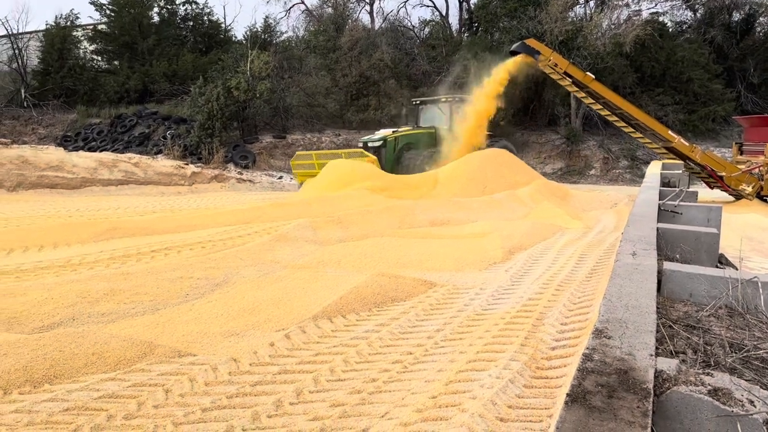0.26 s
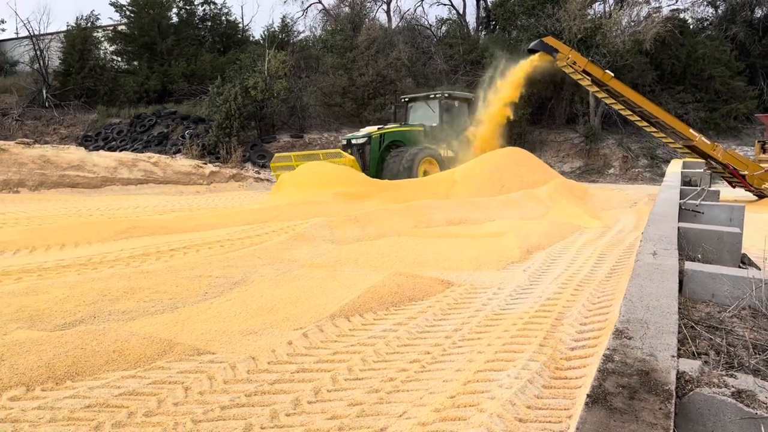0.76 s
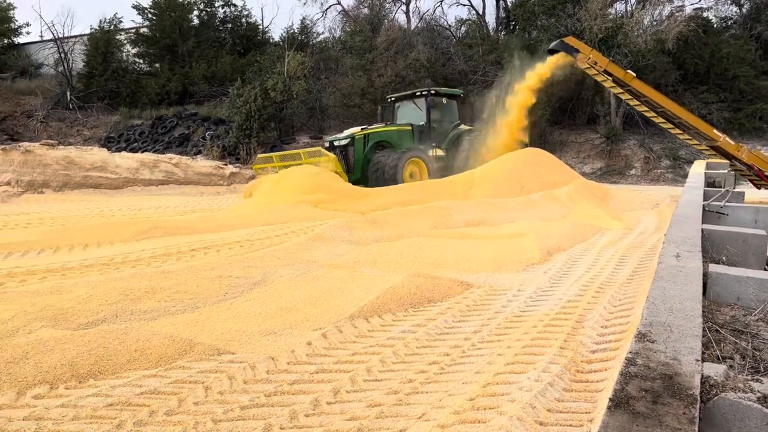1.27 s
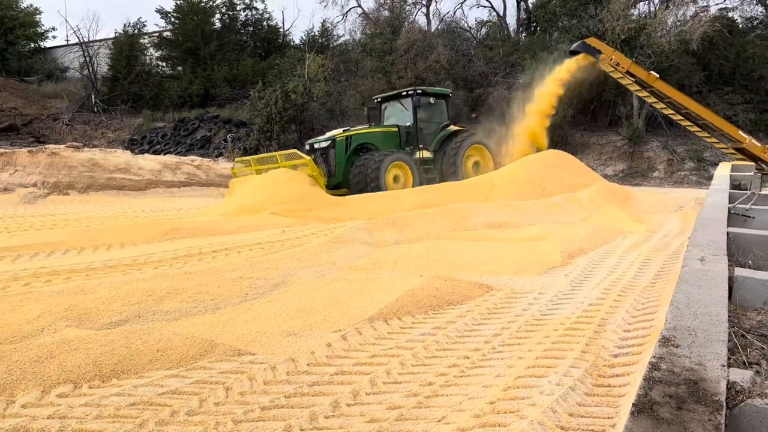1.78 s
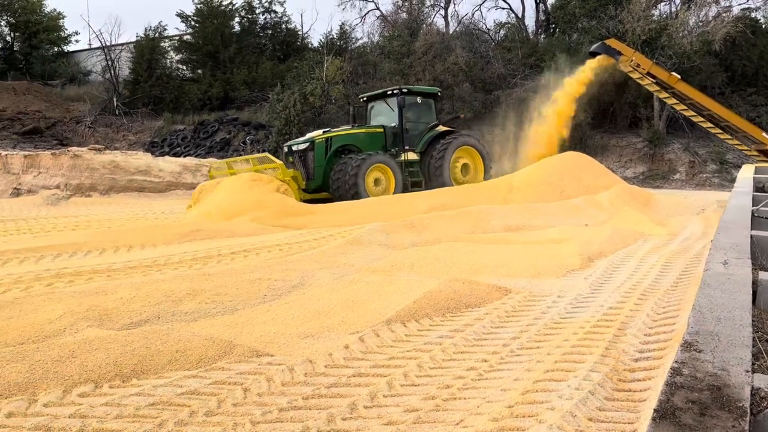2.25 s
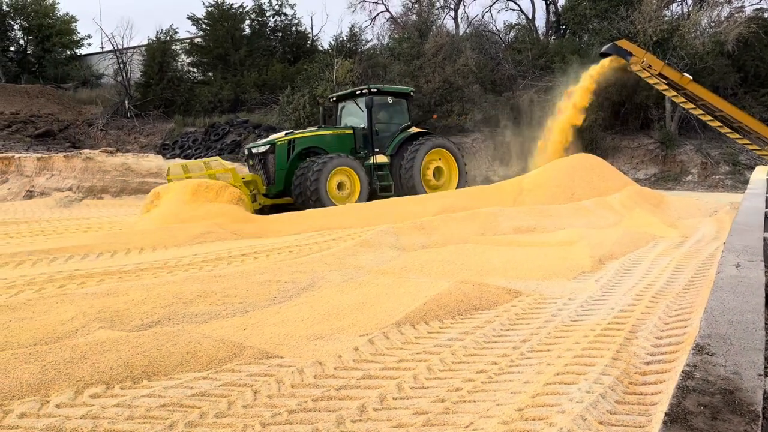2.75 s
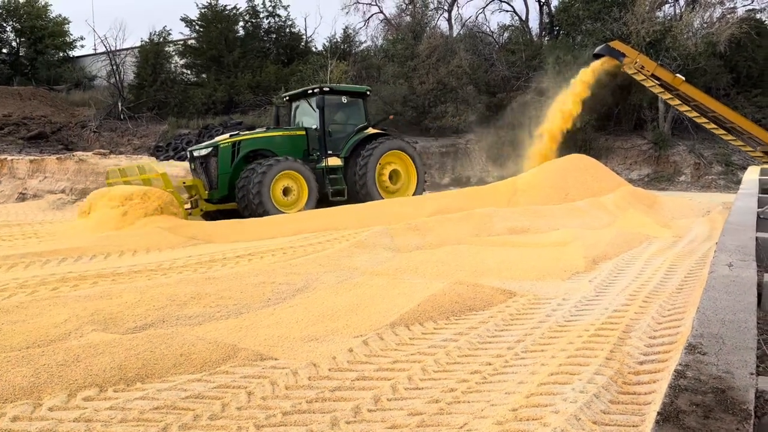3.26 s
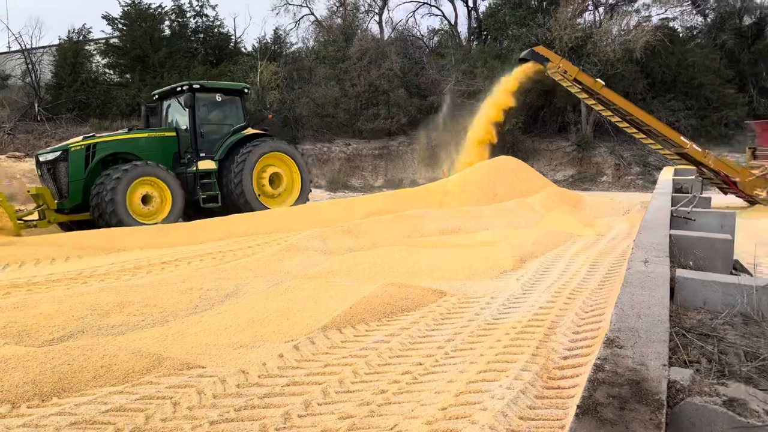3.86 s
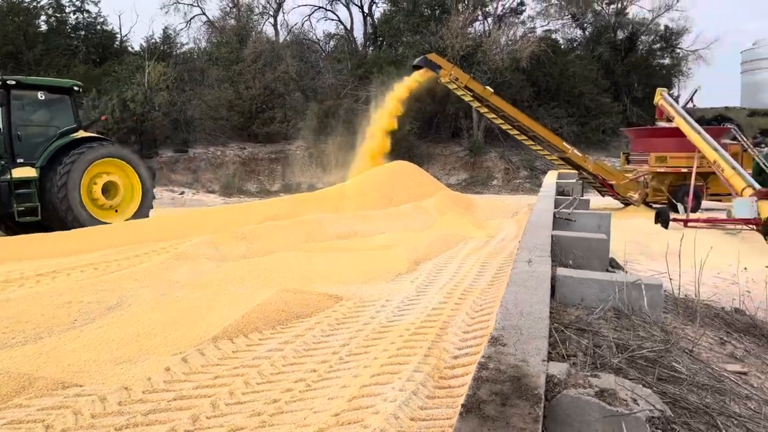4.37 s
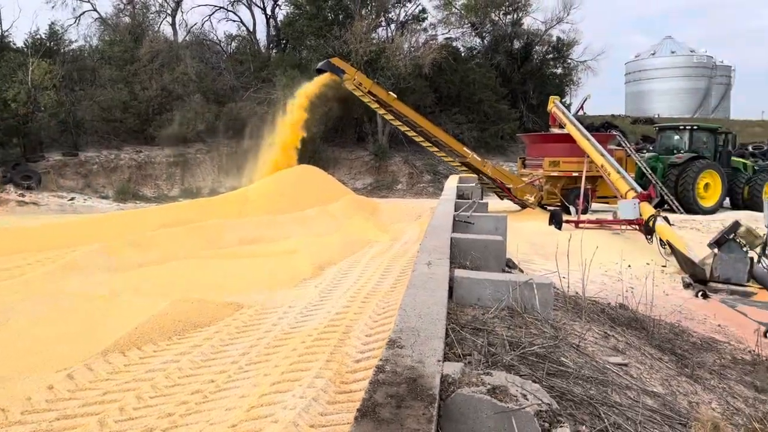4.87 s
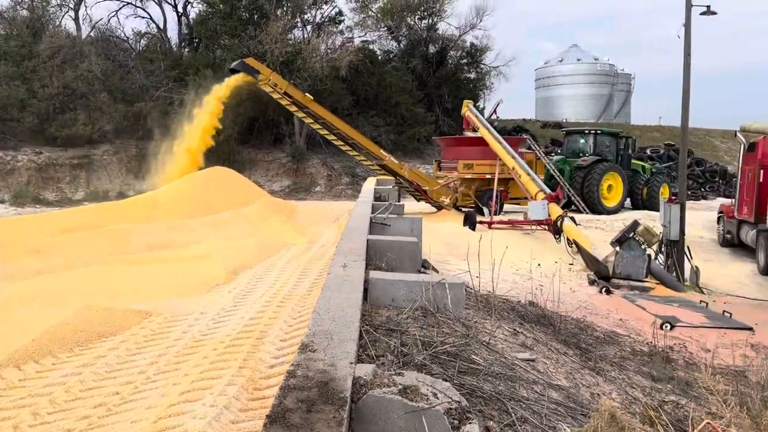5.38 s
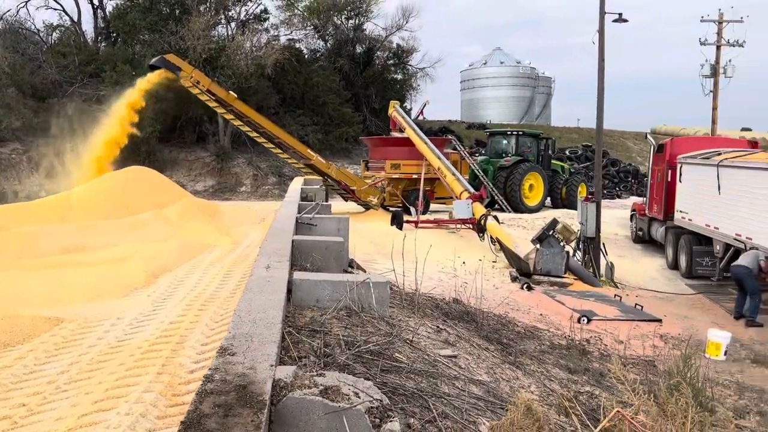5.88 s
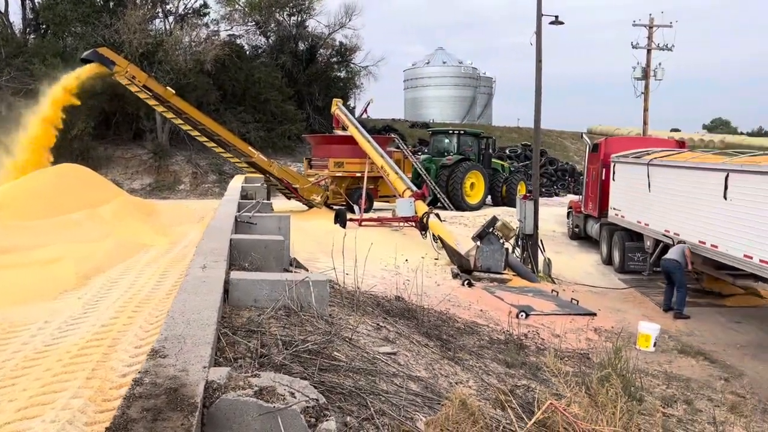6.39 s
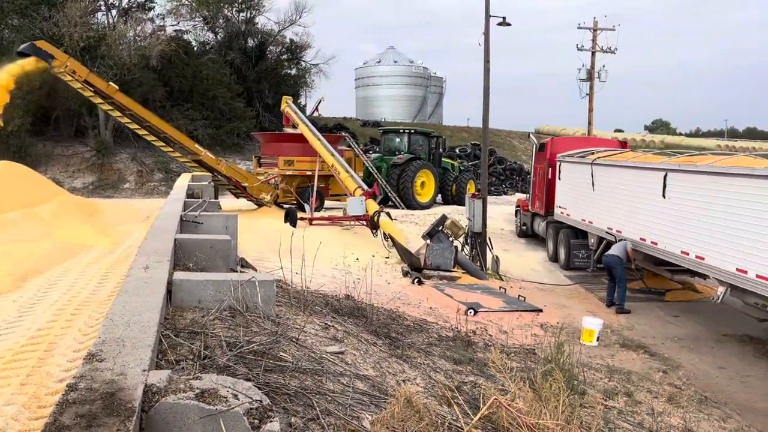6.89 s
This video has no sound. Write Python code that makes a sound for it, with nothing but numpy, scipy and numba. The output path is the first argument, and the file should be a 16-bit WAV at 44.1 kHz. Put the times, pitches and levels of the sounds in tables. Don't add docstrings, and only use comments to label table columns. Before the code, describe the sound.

Across an open farm yard, a grain grinder roars densely over a droning diesel, while augers rattle and throb about eight times a second and grain hisses. Dull knocks and small clatter strike sheet metal. Wind buffets the handheld microphone throughout, lightly at first, then in heavy low thumps during the last third, as a faint turbo whine dips and rises.

```python
import sys
import numpy as np
from scipy import signal
from scipy.fft import rfft, irfft, next_fast_len
from scipy.io import wavfile
from scipy.ndimage import uniform_filter1d, map_coordinates
from numba import njit

SR = 44100
rng = np.random.default_rng(int(sys.argv[2]) if len(sys.argv) > 2 else 0)


def convert_level_to_amplitude(level_db):
    exponent = np.asarray(level_db, float) / 20
    return 10 ** exponent


def materialize(psi):
    bounded = np.clip(np.atleast_2d(psi).T, -1, 1)
    quanta = np.round(bounded * 32767).astype(np.int16)
    wavfile.write(sys.argv[1], SR, quanta)


N = 314874
T = np.arange(N) / SR
SIZE = next_fast_len(N)
HZ = np.arange(SIZE // 2 + 1) * SR / SIZE
LEFT_RIGHT = np.array([[1], [-1]])


def curves(table):
    s, *columns = np.transpose(table)
    return [np.interp(T, s, column) for column in columns]


def unit(x):
    return x / np.sqrt(np.mean(x ** 2))


def walk(rate_hz):
    levels = rng.standard_normal(int(T[-1] * rate_hz) + 3)
    smooth = map_coordinates(levels, [T[::64] * rate_hz], order=3)
    return unit(smooth.repeat(64)[:N])


def grit(spiky_db):
    return rng.standard_normal((2, N)) * convert_level_to_amplitude(spiky_db * rng.exponential(size=N))


def roar(colour, source, flicker_db, rate_hz, count):
    hz, db = np.transpose(colour)
    octave = np.log2(np.clip(HZ, hz[0], hz[-1]) / hz[0])
    gain = convert_level_to_amplitude(np.interp(octave, np.log2(hz / hz[0]), db))
    spectrum = rfft(source, SIZE) * gain * (HZ > hz[0]) * (HZ < hz[-1])
    place = octave / octave[-1] * (count - 1)
    total = 0
    for k in range(count):
        band = irfft(spectrum * np.clip(1 - abs(place - k), 0, 1), SIZE)[:, :N]
        total = total + band * convert_level_to_amplitude(flicker_db * walk(rate_hz))
    return unit(total)


@njit
def svf(x, hz, width):
    y, b, l = np.empty(len(x)), 0., 0.
    for i in range(len(x)):
        g, k = np.tan(np.pi * hz[i] / SR), width / hz[i]
        v = (b + g * (x[i] - l)) / (1 + g * (g + k))
        b, l, y[i] = 2 * v - b, l + 2 * g * v, k * v
    return y


def ring(hz, width_hz):
    return unit(np.array([svf(svf(row, hz, width_hz), hz, width_hz) for row in grit(.8)]))


def tone(hz, db, wobble_hz, waver_db):
    phase = 2 * np.pi * np.cumsum(hz + wobble_hz * walk(30.)) / SR
    return np.sqrt(2) * convert_level_to_amplitude(db + waver_db * walk(7.3)) * np.sin(phase)


def throb(depth_db, first_s, sharp):
    paddle_hz = 8.5
    turn = np.cos(2 * np.pi * paddle_hz * (T - first_s)) - 1
    strength = 1.5 + .5 * np.tanh(walk(paddle_hz))
    return convert_level_to_amplitude(depth_db * np.exp(sharp * turn) * strength)


# start_s, facing_grinder (0-1), body_shading_troughs (0 up), exhaust_in_view (0-1),
# augers_in_view (0-1)
PHONE_TURN = [(0, 0.4, 0, 0.17, .5), (.5, 0.47, 0.13, 0.4, .5), (1.3, 0.2, 0.36, 0.32, 0.67),
              (2.1, 0, 0.6, 0.5, 0.3), (2.8, .3, 1, 0.66, 0.76), (3.35, 0.63, 1.2, 0.82, 1),
              (3.7, 0.44, .6, 0.3, 0.57), (4.1, .75, 0, 0.63, .9), (4.5, 0.66, 0.3, 0.42, 0.2),
              (5.1, 0.63, 0.77, 0.62, 0.35), (5.9, 0.64, 0.4, 0.66, 0.57), (6.5, 0.7, .5, 0.88, 0.8),
              (7.14, 0.76, .1, 0.95, 0.6)]


def phone_turn():
    return curves(PHONE_TURN)


# start_s, strength_db, coarseness (-1 fine to 1 coarse)
WIND_STRENGTH = [(0, -29.5, 0.06), (.5, -29.5, 0.044), (1.2, -31.5, -0.0062), (1.9, -28.5, 0.052),
                 (2.5, -28.5, -0.24), (3., -33, 0.41), (3.5, -28.5, -0.056), (4.2, -26.5, -0.13),
                 (4.6, -28, -0.11), (5.2, -26, -0.078), (5.45, -29, -0.11), (5.7, -25, 0.26),
                 (6., -21, 0.29), (6.22, -22, 0.18), (6.35, -26, -0.49), (6.6, -29.5, 0.26),
                 (6.85, -24.5, 0.24), (7.14, -28.5, -0.13)]
# peak_s, level_db, eddy_hz
WIND_SWELLS = [(0.08, -25.5, 236), (0.224, -26, 235), (0.504, -18, 132), (0.559, -27, 132),
               (0.768, -29, 176), (0.803, -19, 98), (0.803, -21, 315), (0.893, -24, 74),
               (0.928, -25, 236), (1.252, -25, 236), (1.262, -21, 74), (1.282, -21, 315),
               (1.671, -32, 132), (1.715, -26, 290), (1.9, -21, 269), (1.27, -25, 220), (1.821, -23, 315),
               (1.836, -25, 74), (2.165, -35, 132), (2.3, -22, 422), (2.355, -27, 74), (2.464, -27, 422),
               (2.844, -21, 315), (3.327, -25, 55), (3.332, -23, 315), (3.377, -24, 315),
               (3.392, -25, 98), (3.527, -25, 236), (3.886, -26, 314), (3.941, -29, 315),
               (3.981, -29, 176), (4.076, -24, 422),
               (4.3, -27, 420), (4.5, -19.5, 330), (5.62, -29, 198), (6.04, -26, 200), (5.88, -23, 180),
               (4.39, -23, 132), (4.425, -28, 132), (4.5, -16, 98), (4.654, -28, 74), (4.904, -28, 236),
               (5.298, -20.5, 234), (5.373, -21, 236), (5.468, -28, 132), (5.567, -19.5, 132),
               (5.662, -7.5, 74.5), (5.807, -21, 74), (5.842, -17, 74), (5.877, -24, 236), (5.976, -11, 74),
               (6.0, -19, 236), (6.066, -17, 98), (6.176, -14, 98), (6.241, -12.5, 131), (6.281, -31, 176),
               (6.341, -25, 315), (6.41, -18, 315), (6.48, -22.4, 422), (6.585, -19, 422), (6.67, -21, 315),
               (6.715, -22.5, 132), (6.82, -21, 98), (6.834, -16.5, 422), (6.854, -27, 98),
               (6.914, -20, 315), (7.079, -21, 176),
               (.28, -31, 55), (5.96, -18, 50), (4.72, -33, 140), (5.4, -26, 140), (6.86, -20, 270),
               (.8, -24, 280), (.92, -26, 100), (2.84, -26.5, 70), (.46, -31, 65), (1.09, -28, 60),
               (1.99, -27, 55), (2.47, -33, 60), (3.12, -25, 50), (3.5, -25, 60), (4.09, -27, 65),
               (4.3, -20.5, 125), (5.36, -35, 55), (5.53, -30, 110), (5.75, -20, 150), (5.795, -15.5, 420),
               (5.83, -18, 250), (5.935, -16, 95), (6.0, -24, 330), (6.1, -21.5, 140), (6.14, -18, 90),
               (6.3, -33, 55), (6.46, -17, 90), (7.12, -26, 60.5), (.55, -22.5, 330), (3.25, -25, 260),
               (1.45, -30, 320), (1.0, -27, 140)]


def gust(layer_hz, layer_db, restless_db):
    wind_db, coarse = curves(WIND_STRENGTH)
    tilt_db = 7.5 * coarse * np.log2(134.0 / layer_hz)
    power = convert_level_to_amplitude(2 * (wind_db + layer_db + tilt_db + restless_db * walk(25.)))
    for s, db, hz in WIND_SWELLS:
        near = slice(max(int((s - .15) * SR), 0), int((s + .15) * SR))
        away = (T[near] - s) / (0.0098 + 1.3 / hz)
        octaves = np.log2(hz / layer_hz) / 0.78
        power[near] += convert_level_to_amplitude(2 * db) * np.exp(-away ** 2 - octaves ** 2)
    return np.sqrt(power)


def swirl(colour, hold_s):
    air = roar(colour, rng.standard_normal((2, N)), 2.7, 30., count=1)
    span = int(hold_s * SR)
    power = uniform_filter1d(uniform_filter1d(air ** 2, span), span)
    return unit(air / np.sqrt(power + 0.018))


def swings(eddies, gain_db, cycles):
    out, t = np.zeros(N), np.arange(-1500, 1500) / SR
    for s, db, hz, sign in eddies:
        pressure = np.cos(2 * np.pi * hz * t) * np.exp(-(t * hz / cycles) ** 2)
        out[int(s * SR) - len(t) // 2:][:len(t)] += sign * convert_level_to_amplitude(db + gain_db) * pressure
    return out


def lull(eddies):
    depth, cycles = .7, 1.1
    out, t = np.ones(N), np.arange(-1500, 1500) / SR
    for s, _, hz, _ in eddies:
        out[int(s * SR) - len(t) // 2:][:len(t)] *= 1 - depth * np.exp(-(t * hz / cycles) ** 2)
    return out


# pitch_hz, level_db
RUMBLE_COLOUR = [(18, -32), (30, -14), (45, 0.5), (62, 0.5), (100, -1), (125, -11), (170, -18.5)]
BUFFET_COLOUR = [(80, -26), (125, 1), (180, -4.5), (250, -9.5), (340, -12)]
FLUTTER_COLOUR = [(190, -18), (270, -1), (350, 0), (450, -4.5), (600, -9.5), (900, -17)]
# peak_s, peak_db, pitch_hz, push (+1) or suck (-1)
EDDIES = [(0.078, -12, 227, -1.1), (0.224, -9, 142, 0.89), (0.457, -12, 70, -1), (0.507, -13, 140, -0.94),
          (0.559, -13, 144, -1.1), (0.806, -18, 167, 0.88), (0.930, -9.5, 230, 0.95), (1.107, -13, 127, 1),
          (1.257, -11, 82, 1), (1.672, -11, 192, 0.92), (1.712, -8.5, 276, 1), (1.798, -14, 150, -0.88),
          (1.831, -10, 107, -1.2), (1.965, -21, 149, -0.89), (2.162, -13, 126, -1), (2.297, -18, 206, 1),
          (2.336, -15, 99, 1), (2.465, -22, 311, -1), (2.641, -18, 113, 1), (2.814, -11.5, 143, 1),
          (2.845, -7, 259, 0.89), (3.126, -19, 91, 1), (3.324, -13, 151, 1), (3.503, -17, 151, 0.89),
          (3.951, -10, 272, 1), (3.979, -9, 120, 1), (4.034, -9, 154, 0.94), (4.076, -13, 88, -0.88),
          (4.392, -11, 143, 1), (4.489, -12, 160, -1.1), (4.655, -10, 71, 1), (4.904, -11, 240, 0.94),
          (5.132, -17, 122, 1), (5.297, -10.5, 250, 1), (5.374, -13, 242, 1), (5.465, -6, 146, -1),
          (5.827, -2, 197, 1), (5.992, -2, 220, 1), (6.409, -10.5, 208, -1), (6.452, -15, 141, -1),
          (6.478, -15, 157, -1.1), (6.584, -11, 187, -1), (6.669, -8, 206, -1.1), (6.721, -7, 145, 1),
          (6.822, -9, 140, -1), (6.847, -14, 172, -0.9), (6.873, -8, 114, 1), (6.915, -9, 225, 1),
          (7.079, -9, 147, -1.1)]
SLAPS_OF_AIR = [(4.495, -11, 101, 1), (4.513, -8.5, 100, 0.7), (5.81, -8, 70, 1), (5.657, -11, 80, -0.87),
                (5.668, -10, 90, 0.91), (5.756, -12.5, 118, -0.85), (5.777, -6.5, 150, -1.1),
                (5.917, -5, 172, -1.1), (6.148, -9, 130, -0.89), (6.223, -4.5, 193, -1),
                (5.803, -11, 80, -1), (5.843, -4, 80, 1), (5.937, -4, 79, -1), (5.977, -2, 72, 1),
                (6.069, -6, 100, 0.94), (6.174, -3, 105, -0.93), (6.243, -8, 115, -1)]


def wind():
    rumble = swirl(RUMBLE_COLOUR, 0.074) * gust(70., 1.2, 0.9) * convert_level_to_amplitude(-1.0)
    buffet = swirl(BUFFET_COLOUR, 0.019) * gust(140., -2.54, 2.) * convert_level_to_amplitude(-0.5)
    flutter = swirl(FLUTTER_COLOUR, 0.037) * gust(330., -2, 2) * convert_level_to_amplitude(-3.0 + 1.37 * walk(60.))
    mid = (rumble[0] + buffet[0]) * lull(EDDIES + SLAPS_OF_AIR) + flutter[0]
    mid = mid + swings(EDDIES, -2.5, 0.57) + swings(SLAPS_OF_AIR, 0.1, 0.59)
    side = convert_level_to_amplitude(-13.0) * rumble[1] + convert_level_to_amplitude(-10.0) * buffet[1] + convert_level_to_amplitude(-6.5) * flutter[1]
    return mid + side * LEFT_RIGHT


# pitch_hz, width_hz, level_db, loss_db (taken off as the grinder is faced)
TRACTOR_RINGS = [
    (928, 220, -36, 4),
    (1450., 450, -38.5, 14),
    (3100, 620, -45, 7),
]


def tractor():
    facing, *_ = phone_turn()
    total = 0
    for hz, width_hz, db, lost_db in TRACTOR_RINGS:
        level_db = db - lost_db * facing + 2.0 * walk(12.)
        total = total + ring(hz * (1 + 0.04 * walk(5.)), width_hz) * convert_level_to_amplitude(level_db)
    return total


# pitch_hz, level_db
ENGINE_COLOUR = [(40, -41), (90, 1), (300, 0), (480, 0), (620, -2), (740, 2.5), (950, -0.5), (1150, -4),
                 (1500, -3), (1750, -12), (2100, -28)]


def engine():
    _, _, exhaust, _ = phone_turn()
    level_db = -28. + 4 * exhaust + .5 * walk(4.3)
    return roar(ENGINE_COLOUR, grit(0.41), 0.92, 14., count=6) * convert_level_to_amplitude(level_db)


# pitch_hz, level_db
GEAR_HUM = [
    (600, -54),
    (1085, -51),
    (1196, -49),
    (1312, -56),
]


def gear_hum():
    return sum(tone(hz, db, 1.6, 0.62) for hz, db in GEAR_HUM)


# start_s, pitch_hz, level_db
TURBO_GLIDE = [(3.6, 2810, -70), (4.4, 2770, -49), (5.0, 2680, -48), (5.4, 2600, -52), (5.72, 2545, -45),
               (5.87, 2455, -43), (5.97, 2485, -38), (6.1, 2478, -44), (6.4, 2530, -45), (6.55, 2640, -47),
               (6.7, 2700, -44), (6.95, 2770, -47), (7.14, 2810, -53)]


def turbo_glide():
    return curves(TURBO_GLIDE)


def turbo_whine():
    return tone(*turbo_glide(), 6., 2.4) * convert_level_to_amplitude(-.6)


def intake():
    hz, db = turbo_glide()
    return ring(hz + 33.0 * walk(8.2), 170.) * convert_level_to_amplitude(db + 1.8 * walk(12.0))


def clatter():
    blows, ring_s = 400, .022
    out, t = np.zeros(N + SR), T[:int(.2 * SR)]
    for when, octave, size, length in rng.random((blows, 4)):
        hz, decay_s = 650 * 2 ** (3.1 * octave), ring_s * (.5 + length)
        shape = t / decay_s * np.exp(1 - t / decay_s)
        level = convert_level_to_amplitude(-43. - 16. * octave + 2.6 * size)
        out[int(when * N):][:len(t)] += level * shape * np.sin(2 * np.pi * hz * t)
    return out[:N]


# start_s, peak_db, pitch_hz
BONNET_KNOCKS = [(0.286, -27, 804), (0.464, -23, 802), (0.67, -21, 961), (0.747, -22, 1030),
                 (1.006, -23, 990), (1.057, -28, 783), (1.327, -17.5, 726), (1.664, -22, 940),
                 (1.834, -28, 880), (1.919, -14.5, 794), (2.07, -19, 865), (2.128, -29, 910),
                 (2.197, -18, 770), (2.27, -21, 778), (2.437, -22, 680), (2.474, -20, 737),
                 (2.756, -26, 830), (3.323, -22, 680), (3.517, -22, 711), (3.75, -18, 1010),
                 (3.885, -13, 752), (4.068, -23, 860), (4.129, -21, 855), (4.469, -18, 760),
                 (4.93, -18, 836), (5.001, -28, 834), (5.168, -28, 950), (5.359, -20, 920),
                 (5.526, -21, 843), (5.944, -20, 850), (6.279, -27, 821), (6.348, -21, 940),
                 (6.584, -16, 955), (6.621, -16, 950), (6.693, -20, 748), (6.759, -21, 940),
                 (6.849, -17, 690), (6.902, -24, 740), (6.98, -13, 720), (7.057, -12, 802)]


def knocks():
    decay_s = 0.0065
    out, t = np.zeros(N + SR), T[:int(.06 * SR)] / decay_s
    for s, db, hz in BONNET_KNOCKS:
        thump = t * np.exp(1 - t) * np.sin(2 * np.pi * hz * decay_s * t)
        out[int(s * SR):][:len(t)] += convert_level_to_amplitude(db - 6) * thump
    return out[:N]


# start_s, peak_db
KERNEL_SHOWERS = [(0.8794, -27), (0.9194, -27), (1.4656, -29), (1.703, -30), (2.532, -30), (3.375, -27),
                  (1.2694, -26), (2.8994, -26), (3.1194, -26), (3.2394, -26), (3.3444, -18), (3.5894, -27),
                  (4.0494, -25), (6.2966, -28), (6.533, -19.5), (6.652, -22), (6.8794, -26), (7.0, -20),
                  (7.1094, -27)]


def rattles():
    colour = [(2200, -8), (3800, 6.0), (5200, 1), (7500, -2), (13000, -26)]
    swell = sum(convert_level_to_amplitude(db - 9.5) * np.exp(-((T - s - .008) / 0.011) ** 2) for s, db in KERNEL_SHOWERS)
    return swell * roar(colour, grit(3.7), 0.66, 30.6, count=1)


# pitch_hz, level_db
GRAIN_COLOUR = [(4600, -25), (5600, 0), (6500, 0), (7400, 0), (7800, -3), (10000, -6), (12000, -10),
                (14000, -14), (15700, -18), (17000, -40)]


def grain():
    facing, *_ = phone_turn()
    level_db = -37.5 + 1.5 * facing + 0.24 * walk(6.9)
    clumps = convert_level_to_amplitude(.65 * walk(38.))
    hiss = roar(GRAIN_COLOUR, grit(1.1), 0.41, 30., count=4)
    return hiss * convert_level_to_amplitude(level_db) * throb(0.51, 0.11, 1.0) * clumps


def troughs():
    facing, shade, *_ = phone_turn()
    low_hz = 3945 + 300. * shade + 61.0 * walk(6.)
    high_hz = 5070 - 200. * shade + 61.0 * walk(6.)
    low_db = -43 + 2.5 * shade - 2.5 * facing + .8 * walk(6.)
    high_db = -39 - 10 * shade - 2.5 * facing + .8 * walk(6.)
    return ring(low_hz, 720.0) * convert_level_to_amplitude(low_db) + ring(high_hz, 750.0) * convert_level_to_amplitude(high_db)


# pitch_hz, level_db
AUGER_COLOUR = [(2900, -14), (3500, 1.5), (4000, 3.5), (4500, 0.5), (5000, 1), (5350, 3), (6000, -33)]


def augers():
    *_, view = phone_turn()
    rattle = roar(AUGER_COLOUR, grit(0.77), 0.36, 11.0, count=3) * convert_level_to_amplitude(-39.5 + 0.24 * walk(6.9))
    return (rattle + troughs()) * throb(1.5, 0.059, 7.9) * convert_level_to_amplitude(4. * (view - .5))


def hammers():
    facing, *_ = phone_turn()
    return ring(2463 + 60. * walk(3.), 220.) * convert_level_to_amplitude(-60 + 21.5 * facing + 1.3 * walk(14.0))


# pitch_hz, level_db
GRINDER_COLOUR = [(1200, -23), (1500, 2), (1700, 0.5), (1830, 1.5), (1980, 1), (2300, 3.5), (2550, 0),
                  (2850, -2), (3050, -4), (3270, -3.5), (3700, -6.5)]


def grinder():
    facing, *_ = phone_turn()
    level_db = -37. + 4.5 * facing + 0.24 * walk(6.9)
    return roar(GRINDER_COLOUR, grit(0.77), 0.47, 9., count=5) * convert_level_to_amplitude(level_db)


def machines():
    drive = tractor() + engine() + intake()
    feed = rattles() + grain() + augers()
    return drive + feed + hammers() + grinder()


def point_sources():
    return np.array([[1], [0]]) * (gear_hum() + turbo_whine() + clatter() + knocks())


# lag_s, level_db
YARD_ECHOES = [
    (.0047, -14),
    (.0131, -18),
]


def yard(pair):
    out = pair
    for lag_s, db in YARD_ECHOES:
        late = T - lag_s * (1 + .09 * walk(3.))
        out = out + convert_level_to_amplitude(db) * np.array([np.interp(late, T, row) for row in pair])
    return out


# pitch_hz, likeness (0-1), left_lead_rad,
# left_minus_right_db
PORT_PAIR = [(40, 0.3, -1, -2.5), (304, 0.26, 1, 3.5), (990, 0.5, -0.4, 0), (1310, 0.36, -2.5, -1.5),
             (1520, 0.21, -4, -2), (1850, 0.15, -5, 5.5), (2000, 1, -5.5, -1), (2300, 1, -5.5, -2),
             (2880, 1, -5, 1), (3620, 0.34, -5.5, 1), (4660, 1, -5.5, 4), (5240, 0.6, -5, 0),
             (5800, 0.25, -4, -0.5), (6400, 0.7, -7.5, 0),
             (7300, .85, -2.7 * np.pi, 1), (8300, .98, -3 * np.pi, 0), (12000, .99, -4 * np.pi, 0),
               (13800, .95, -4.5 * np.pi, 0), (15500, .97, -5 * np.pi, 0), (19000, .97, -6 * np.pi, 0)]


def ports(pair):
    hz, *columns = np.transpose(PORT_PAIR)
    like, lead, pan_db = (np.interp(HZ, hz, column) for column in columns)
    like = np.clip(like, 0, 1)
    shared, apart = rfft(pair, SIZE)
    both = np.sqrt((1 + like) / 2) * shared + LEFT_RIGHT * np.sqrt((1 - like) / 2) * apart
    placed = both * np.exp(.5j * LEFT_RIGHT * lead) * convert_level_to_amplitude(LEFT_RIGHT * pan_db / 2)
    return irfft(placed, SIZE)[:, :N]


def sway(pair):
    spread_s = 3.5e-6
    slope = irfft(rfft(pair, SIZE) * 2j * np.pi * HZ, SIZE)[:, :N]
    return pair + .5 * LEFT_RIGHT * spread_s * walk(9.) * slope


def scene():
    far = ports(yard(machines()) + point_sources())
    return sway(far) + wind()


def top_cut(x):
    return signal.sosfilt(signal.butter(12, 15720, fs=SR, output="sos"), x)


def record(dry):
    cut_hz, reach = 38., 1.8
    thin = irfft(rfft(dry, SIZE) * HZ ** 3 / np.sqrt(HZ ** 6 + cut_hz ** 6), SIZE)[:, :N]
    rounded = reach * np.tanh(thin / reach)
    return top_cut(rounded)


dry = scene()
out = record(dry)
materialize(out)
```